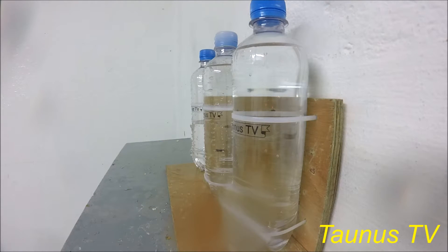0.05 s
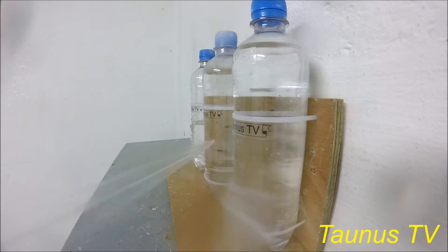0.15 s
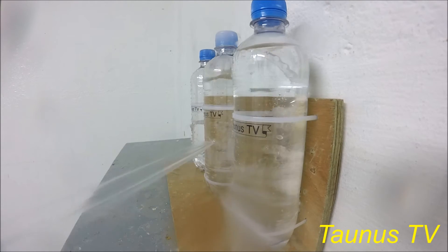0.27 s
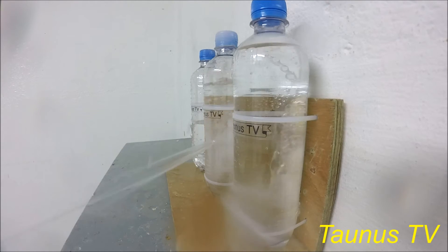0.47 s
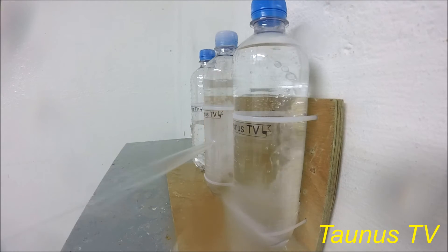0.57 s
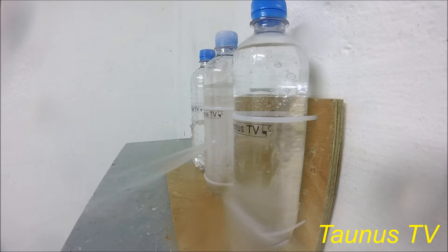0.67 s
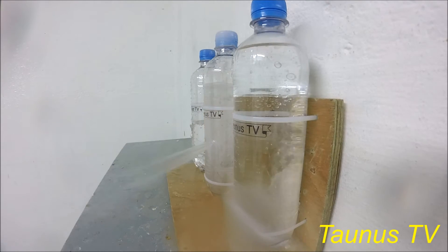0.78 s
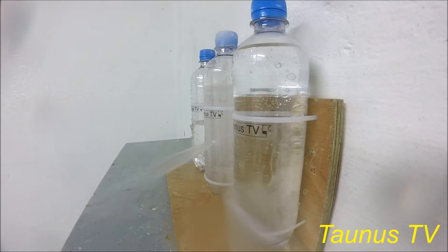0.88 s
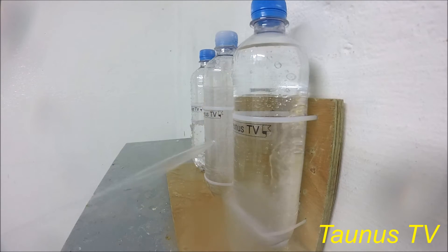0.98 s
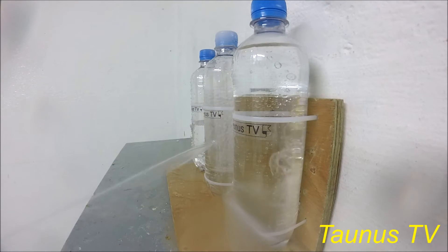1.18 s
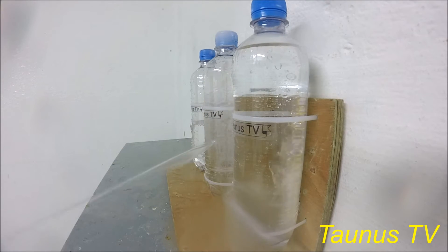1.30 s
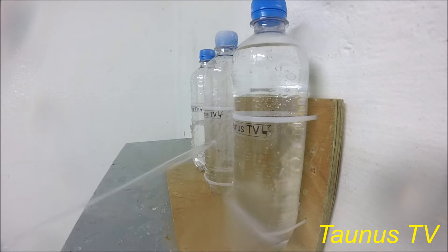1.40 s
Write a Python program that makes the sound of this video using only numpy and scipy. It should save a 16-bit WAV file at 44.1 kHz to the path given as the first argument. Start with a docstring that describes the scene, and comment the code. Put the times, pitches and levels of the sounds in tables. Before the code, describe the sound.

A pellet cracks loudly through full plastic bottles close by at about 0.2 seconds, an instant after a fainter air gun pop from across the room. The bottles thump on a board and the hard-walled room rings for about a second. From 0.5 seconds, quieter water jets build, hissing and pattering with bright drips, rattles on plastic and low drumming until the end, around 1.5 seconds.

```python
"""A pellet cracks through a row of full plastic bottles beside the microphone, 30 ms after an air gun
fires from down a hard-walled room. The bottle walls burst and ring, the bottles thump on their board
and the room rings out. Jets of water then land: dense drops hiss and patter, larger ones pip brightly,
clumps rattle on the plastic and the surface under the jet drums low."""
import sys
import numpy as np
from scipy import signal
from scipy.io import wavfile

SR = 44100
rng = np.random.default_rng(int(sys.argv[2]) if len(sys.argv) > 2 else 0)


def transcribe(signal):
    """Save signal, clipped to [-1, 1], as a 16-bit WAV file at the path in sys.argv[1]."""
    frames = np.atleast_2d(signal).T
    limited = np.clip(frames, -1, 1)
    pcm = np.round(limited * 32767).astype(np.int16)
    wavfile.write(sys.argv[1], SR, pcm)


N = 63945
T = np.arange(N) / SR

# pellet on bottle walls (time [s], crack level [dB], wall ring level [dB], decay [s], low-pass [Hz])
PELLET_HITS = [(.2064, -7.5, -6.5, 0.0012, 12900), (.2079, -10, 2.5, .0012, 5000),
               (.2106, -8, -6, 0.0014, 7000), (.2133, -12.5, -44, 0.0011, 2620),
               (.2152, -12, -25, 0.0023, 1470)]
# bursting wall (frequency [Hz], density [dB])
CRACK_SPECTRUM = [(60, -40), (200, 2), (450, -12.5), (900, -5), (1320, -14), (1600, 0), (2270, -0.5),
                  (3390, 5.5), (4400, -3), (5750, 2), (6500, -2), (7500, -6.5), (9000, 1), (11000, -3),
                  (15000, -10)]
# bottle wall (frequency [Hz], level [dB], T60 [s])
WALL_MODES = [(454, -7.5, 0.006), (663, -30.5, 0.089), (875, -27.5, 0.18), (1595, -22.5, 0.11),
              (2050, -25, 0.057), (2490, -24.5, 0.099), (3190, -18, 0.057), (3334, -4, 0.0082),
              (3470, -15.5, 0.052), (3710, -20, .03), (4840, -24, 0.03), (5780, -11.5, 0.028),
              (7500, -17, 0.019)]
# bottles and stand ringing on (frequency [Hz], level [dB], T60 [s])
STAND_MODES = [(427, -47, 1.47), (537, -41, 1.66), (913, -41, 0.13), (1122, -39, 1.1), (1574, -37, 1),
               (1625, -38.5, 1.44), (1630, -64, 0.61), (1745, -48, 1.1), (3080, -38, 0.41), (3096, -36, .5),
               (3365, -32.5, 0.81), (3440, -35, 0.37), (3345, -43, 0.9), (3430, -33, 1)]
# room tail of the cracks (frequency [Hz], density [dB])
TAIL_SPECTRUM = [(35, -50), (60, -11), (81, -21), (102, -11), (138, 5), (209, -4), (246, 0), (295, -16),
                 (418, -6.5), (480, -17.5), (539, -6.5), (727, -15.5), (1100, -8), (1210, -12.5),
                 (1420, -10.5), (1600, -0.5), (2200, -10.5), (3340, -1.5), (4310, -16), (6530, -20),
                 (8620, -23.5), (10400, -19.5), (15000, -45)]
# bottles shoving the board (time [s], level [dB], length [s])
BOARD_SHOVES = [(0.207, -30, 0.0011), (0.2153, -17, 0.0034), (0.2268, -15.5, 0.0042)]
# board (frequency [Hz], level [dB], T60 [s])
BOARD_MODES = [(45.6, -13, .9), (75.4, -8.5, 0.28), (106, -0.5, 0.048), (144, 6.5, 0.075), (175, -7, 0.083),
               (231, -4, 0.099), (278, -3.5, 0.13)]
# gun report (frequency [Hz], density [dB])
SHOT_SPECTRUM = [(59, -40), (100, -1), (1090, -27.5), (1560, -11), (2090, -10), (2370, -12), (3050, -4.5),
                 (3760, 0), (4180, -13), (6480, -2), (8170, -12.5), (10500, -15), (15000, -31)]
# water landing (time [s], hiss [dB], patter [dB], drumming [dB])
FLOW_LEVELS = [(.22, -75.5, -77.5, -84), (.45, -57.5, -45.5, -58), (.53, -54.5, -50.5, -53.5),
               (.6, -50.5, -47, -58.5), (.73, -44.5, -46, -53), (.77, -39.5, -43.5, -50.5),
               (.85, -37, -41.5, -45), (0.929, -39, -38.5, -41.5), (1.03, -39.5, -39.5, -45),
               (1.2, -40.5, -39.5, -43), (1.32, -43, -39, -39.5), (1.4, -45.5, -42, -42.5),
               (1.45, -48, -43.5, -41.5)]
# drop hiss (frequency [Hz], density [dB])
HISS_SPECTRUM = [(2500, -30), (4200, -0.5), (4500, -3.5), (4950, 6.5), (5250, -1.5), (5720, 5.5),
                 (6400, -1), (7000, -4), (7600, 2.5), (8900, -5), (10300, -5.5), (11700, -12.5),
                 (13700, -11), (15500, -18)]
# drop patter (frequency [Hz], density [dB])
PATTER_SPECTRUM = [(260, -28), (450, -10.5), (582, -36), (665, -22), (732, -17.5), (929, -12.5),
                   (1040, -17.5), (1120, -13.5), (1350, -17.5), (1740, -4.5), (1920, -12), (2170, -7.5),
                   (2340, -15), (3530, 0.5), (4400, -29), (5720, -45), (9680, -120)]
# large drops (time [s], level [dB], pitch [Hz], rise [cycles])
LARGE_DROPS = [(.4195, -33, 11800, 2.7), (0.4648, -34.5, 9100, 2.6), (.5069, -30.5, 8900, 1.9),
               (0.5099, -32.5, 9000, 4.5), (.531, -33.5, 8800, 2.6), (0.998, -27, 5700, 5.2),
               (1.0262, -23, 8800, 3.5), (1.073, -33.5, 5500, 4.8), (1.083, -28, 8900, 3),
               (1.128, -25, 9300, 3.5), (1.0929, -21.5, 8900, 4.5), (1.144, -32, 8500, 2.5),
               (1.1525, -35, 8800, 3.3), (1.1607, -27, 6300, 4.5), (1.167, -22, 9100, 2.6),
               (1.1812, -23.5, 9250, 5), (1.202, -27, 5280, 7.6), (1.236, -25.5, 9000, 3.5),
               (1.2686, -28, 6350, 3.5), (1.2925, -29, 5740, 2.8), (1.3083, -26, 8700, 2.1),
               (1.3204, -22.5, 8500, 4), (1.3241, -19.5, 8500, 2.7), (1.330, -23.5, 9200, 3.5),
               (1.3695, -28.5, 8250, 7.2), (1.3795, -30, 8240, 3), (1.3957, -31, 8900, 2.5),
               (1.4081, -26.5, 8840, 3), (1.4092, -26.5, 3610, 6), (1.4184, -29, 8400, 2.9),
               (1.433, -26.5, 8300, 2.3)]
# drop clumps on plastic (time [s], level [dB], length [s])
CLUMPS = [(0.781, -37, .014), (0.848, -39.5, .02), (0.892, -36.5, 0.017), (0.919, -36, 0.03),
          (0.951, -33, 0.01), (0.973, -35.5, 0.032), (1.025, -33, 0.0092), (1.064, -34.5, 0.014),
          (1.096, -33.5, 0.023), (1.116, -33, .024), (1.18, -35.5, 0.017), (1.194, -35, 0.011),
          (1.225, -35, 0.0072), (1.255, -36, 0.012), (1.296, -38.5, .035), (1.368, -37, 0.023),
          (1.41, -32, 0.012)]
# tapped plastic (frequency [Hz], density [dB])
CLUMP_SPECTRUM = [(500, -31), (1500, -20.5), (2300, -12), (3000, -10), (3450, 2), (3750, -1), (4200, -22),
                  (6000, -20), (10000, -45), (15000, -53)]
# surface under the jet (frequency [Hz], level [dB], T60 [s])
SURFACE_MODES = [(51, -8, .15), (128, -20, .15), (163, -1.5, 0.2), (201.3, 7, 0.052), (235, 3, 0.041),
                 (315.3, 0, .12), (347.5, -10, 0.12), (402, -14, 0.071)]
# room decay (frequency [Hz], T60 [s])
ROOM_T60 = [(60, 0.32), (250, 0.44), (600, 0.92), (1600, 1.0), (3300, 1), (5000, 0.89), (9000, 0.29),
            (15000, 0.35)]
# room air (frequency [Hz], density [dB])
AIR_SPECTRUM = [(15, -12), (25, 4), (44, 7), (404, -3.5), (856, -9.5), (1390, -10.5), (2850, -16),
                (3090, -18), (4260, -21), (5420, -26), (15000, -51)]


def pellet_cracks(crack_rise_s=.00019, wall_rise_s=.00035, tail_db=-27):
    """Each plastic wall bursts and rings briefly; bottles, stand and room ring on."""
    hits = np.zeros(N)
    wall = ring(WALL_MODES) * (1 - np.exp(-T / wall_rise_s))
    for time_s, crack_db, wall_db, decay_s, top_hz in PELLET_HITS:
        burst = rng.choice([-1., 1.], N) * np.minimum(T / crack_rise_s, 1) * np.exp(-T / decay_s)
        crack = low_pass(colour(burst, CRACK_SPECTRUM), top_hz)
        crack *= np.linalg.norm(burst) / np.linalg.norm(crack)
        hits += delayed(amp(crack_db) * crack + amp(wall_db) * wall, time_s)
    tail = colour(room_response(), TAIL_SPECTRUM)
    tail *= amp(tail_db) / np.std(tail[:SR // 10])
    return hits + delayed(tail + ring(STAND_MODES), PELLET_HITS[1][0])


def board_thump():
    """Half-sine shoves ring the board under the bottles."""
    push = np.zeros(N)
    for time_s, db, length_s in BOARD_SHOVES:
        pulse = np.sin(np.pi * np.minimum(T / length_s, 1))
        push += delayed(amp(db) * pulse / pulse.sum(), time_s)
    return convolve(push, ring(BOARD_MODES))


def gun_shot(time_s=.1748, level_db=-30, rise_s=.0023, t60_s=.8):
    """The far gun's report, smeared by the room into dying noise."""
    burst = unit(colour(rng.standard_normal(N), SHOT_SPECTRUM)) * np.minimum(T / rise_s, 1)
    return delayed(burst * amp(level_db - 60 * T / t60_s), time_s)


def water_jets(wet=.3):
    """Drops hiss, patter and pip, with room echo; the drumming stays dry."""
    times_s, *levels_db = np.transpose(FLOW_LEVELS)
    hiss_gain, patter_gain, drum_gain = (amp(np.interp(T, times_s, db)) for db in levels_db)
    direct = hiss_gain * unit(colour(drops(per_s=4700, spread_db=4), HISS_SPECTRUM))
    direct += patter_gain * unit(colour(drops(per_s=2500, spread_db=2.3), PATTER_SPECTRUM))
    direct += clump_rattle()
    direct += hiss_gain * spatter()
    for time_s, db, hz, rise_cycles in LARGE_DROPS:
        direct += delayed(amp(db) * pip(hz, rise_cycles), time_s)
    spray = (direct + wet * convolve(direct, room_response())) / np.hypot(1, wet)
    return spray + drum_gain * jet_drumming()


def clump_rattle():
    """Clumps of drops rattle on the bottle walls."""
    envelope = sum(amp(db) * np.sin(np.pi * np.clip((T - time_s) / length_s, 0, 1) ** .7)
                   for time_s, db, length_s in CLUMPS)
    return envelope * unit(colour(drops(per_s=1500, spread_db=.72), CLUMP_SPECTRUM))


def spatter(per_s=170, centre_hz=8840, pitch_count=12, relative_db=-5.5, fade_in_s=1):
    """Random drops pip at scattered high pitches, fading in."""
    pitches_hz = centre_hz * np.exp(.12 * rng.standard_normal(pitch_count))
    pips = sum(convolve(drops(per_s / pitch_count, spread_db=2.5), pip(hz, rise_cycles=3))
               for hz in pitches_hz)
    return amp(relative_db) * unit(pips) * np.minimum(T / fade_in_s, 1) ** 4


def pip(hz, rise_cycles, roughness=.53, top_hz=10600):
    """One drop's soft-edged tone; a random phase walk makes it splashy."""
    t = T[:2000]
    age = t * hz / rise_cycles
    envelope = (age * np.exp(1 - age)) ** 2
    smear_rad = roughness * np.cumsum(rng.standard_normal(len(t))) * np.sqrt(hz / SR)
    return low_pass(envelope * np.sin(2 * np.pi * hz * t + smear_rad), top_hz)


def jet_drumming(flutter_hz=162.3, flutter_db=.5, octave_db=-12.5, settle_span_s=(.65, 1.17)):
    """The jet drums on the surface it meets and flutters more as it settles."""
    phase = 2 * np.pi * np.cumsum(flutter_hz * (1 + .022 * drift(top_hz=21))) / SR
    tone = np.sin(phase) + amp(octave_db) * np.sin(2 * phase)
    flutter = unit((1 + .35 * drift(top_hz=25)) * tone)
    settled = np.interp(T, settle_span_s, [0, 1])
    surface = unit(convolve(drops(per_s=600, spread_db=1.2), ring(SURFACE_MODES)))
    return amp(flutter_db) * settled * flutter + surface


def drops(per_s, spread_db):
    """Drop impacts: random clicks, a few larger than the rest."""
    sizes = amp(spread_db * np.minimum(rng.exponential(1, N), 4)) * rng.choice([-1, 1], N)
    return sizes * (rng.random(N) < per_s / SR)


def room_response(rise_s=.0027):
    """Diffuse echoes, each band dying at its own rate; energy 1."""
    hz, t, bands = signal.stft(rng.standard_normal(N), SR, nperseg=256)
    decay = amp(-60 * t / lookup(ROOM_T60, hz)[:, None])
    tail = signal.istft(bands * decay, SR, nperseg=256)[1][:N]
    tail *= 1 - np.exp(-T / rise_s)
    return tail / np.linalg.norm(tail)


def room_air(level_db=-60.5):
    """Quiet, steady low noise."""
    return amp(level_db) * unit(colour(rng.standard_normal(N), AIR_SPECTRUM))


def ring(modes):
    """Dying sines of a struck body."""
    return sum(amp(db - 60 * T / t60_s) * np.sin(2 * np.pi * hz * T) for hz, db, t60_s in modes)


def colour(x, spectrum, size=4096):
    """Minimum-phase filter of energy 1, shaped to the spectrum."""
    hz = abs(np.fft.fftfreq(size, 1 / SR))
    log_gain = np.log(amp(np.maximum(lookup(spectrum, hz), -100)))
    taps = np.fft.ifft(np.exp(np.conj(signal.hilbert(log_gain)))).real
    return convolve(x, taps / np.linalg.norm(taps))


def lookup(table, hz):
    """Interpolates on a log-frequency axis."""
    knots_hz, values = np.transpose(table)
    return np.interp(np.log(hz + 1), np.log(knots_hz + 1), values)


def drift(top_hz):
    """Smooth random drift, rms 1."""
    return unit(low_pass(rng.standard_normal(N), top_hz))


def low_pass(x, hz):
    """Second-order Butterworth."""
    return signal.lfilter(*signal.butter(2, hz, fs=SR), x)


def convolve(x, response):
    """Convolution cut to N samples."""
    return signal.fftconvolve(x, response)[:N]


def delayed(x, time_s):
    """Starts x at time_s."""
    return np.concatenate([np.zeros(round(time_s * SR)), x, np.zeros(N)])[:N]


def amp(db):
    """Decibels to gain."""
    return 10 ** (np.asarray(db) / 20)


def unit(x):
    """Scales to rms 1."""
    return x / np.sqrt(np.mean(x ** 2) + 1e-20)


def scene():
    """Room air, shot, impact and water; mono."""
    return (room_air() + gun_shot() + pellet_cracks() + board_thump() + water_jets())[None]


def record(dry, low_cut_hz=60, band_limit_hz=15250):
    """Microphone low cut, full-scale clipping, band limit."""
    high_passed = signal.lfilter(*signal.butter(2, low_cut_hz, "high", fs=SR), dry)
    taps = signal.firwin(127, band_limit_hz, window=("kaiser", 9), fs=SR)
    return signal.oaconvolve(np.clip(high_passed, -1, 1), taps[None], "same")


dry = scene()
out = record(dry)
transcribe(out)
```